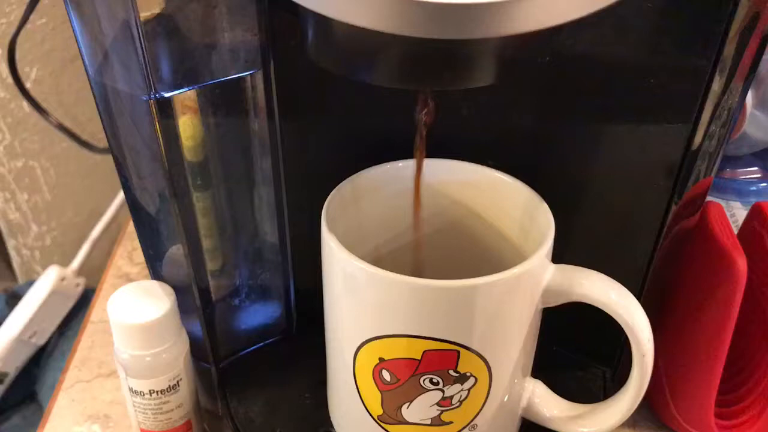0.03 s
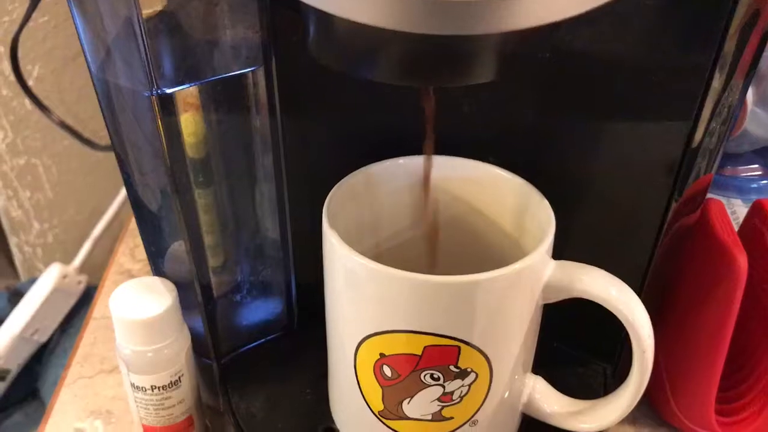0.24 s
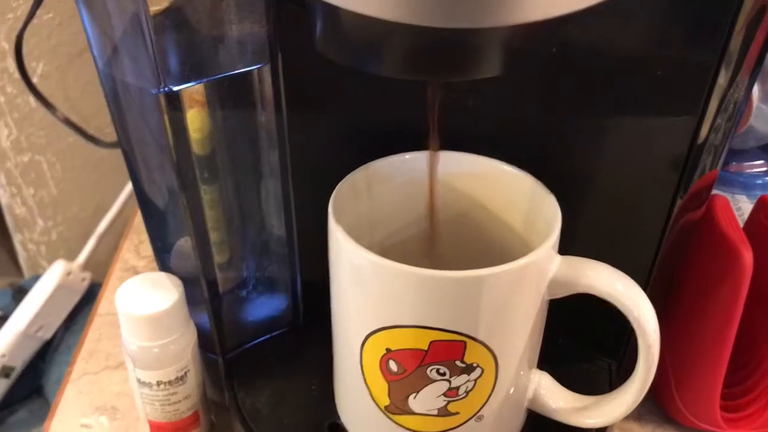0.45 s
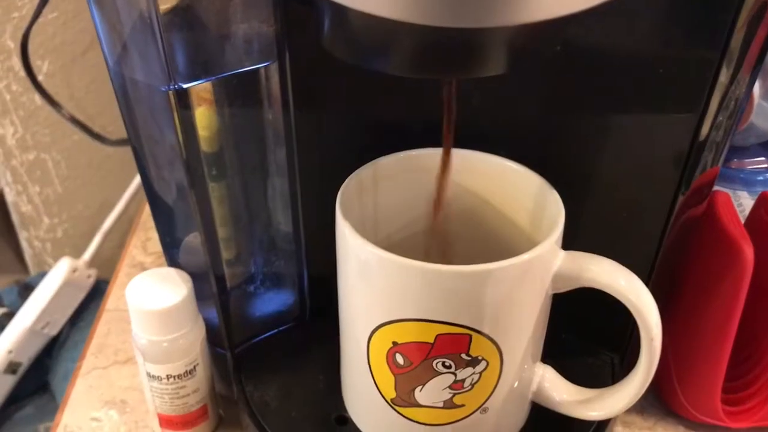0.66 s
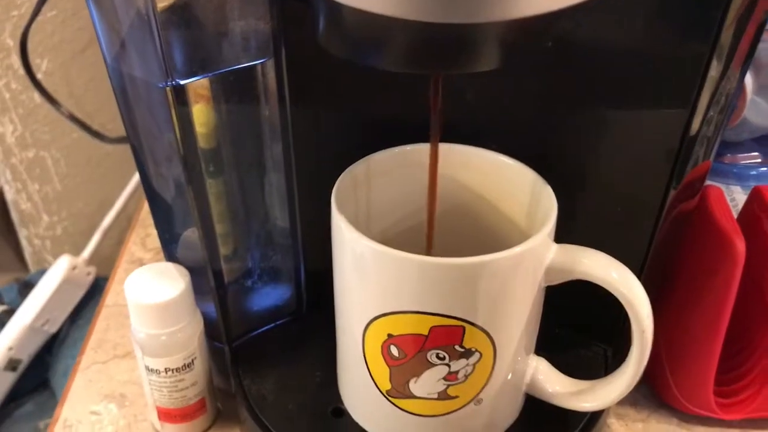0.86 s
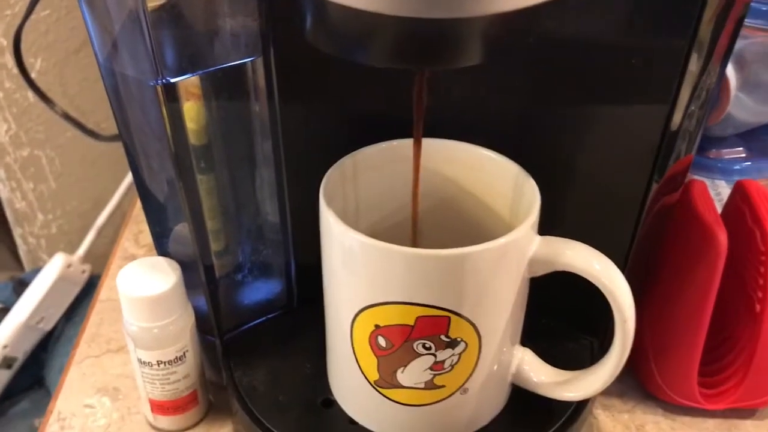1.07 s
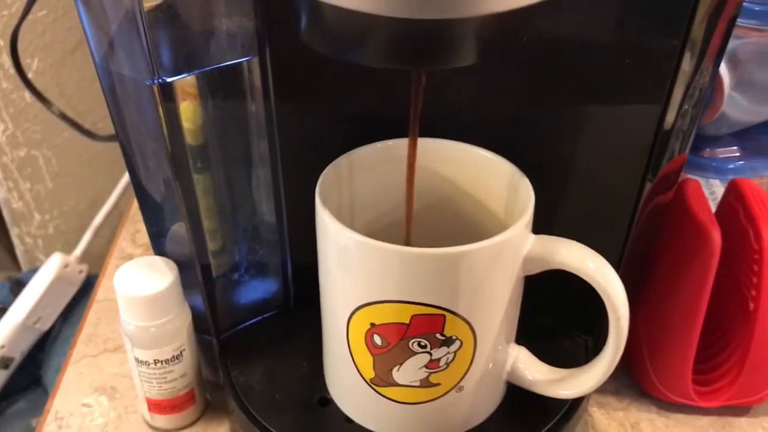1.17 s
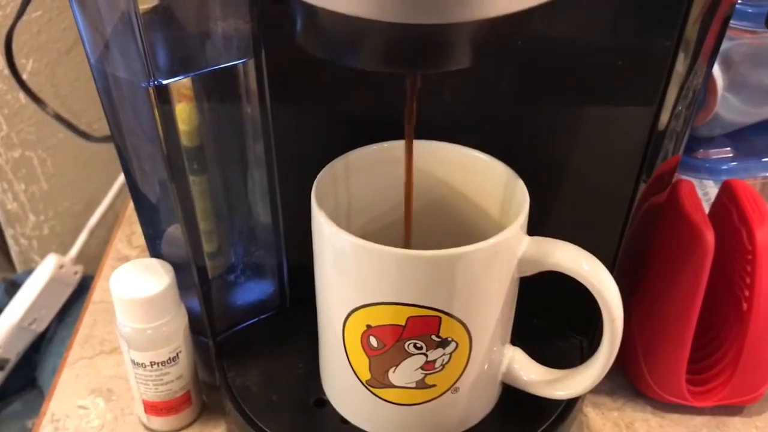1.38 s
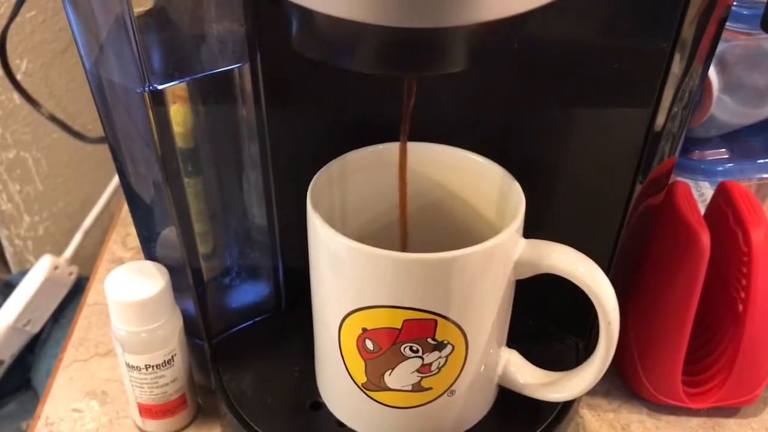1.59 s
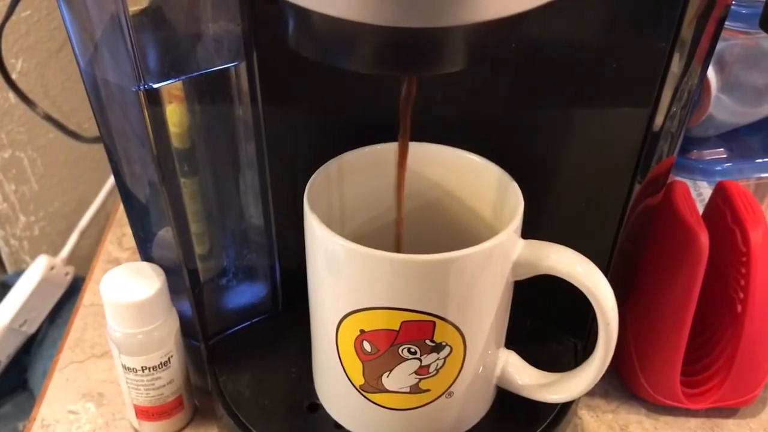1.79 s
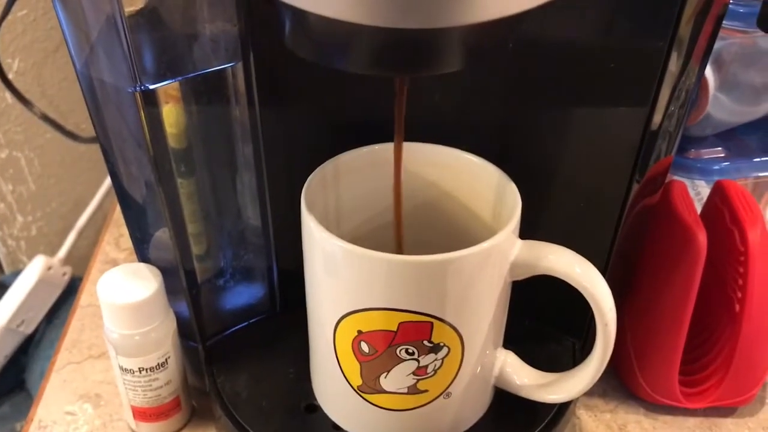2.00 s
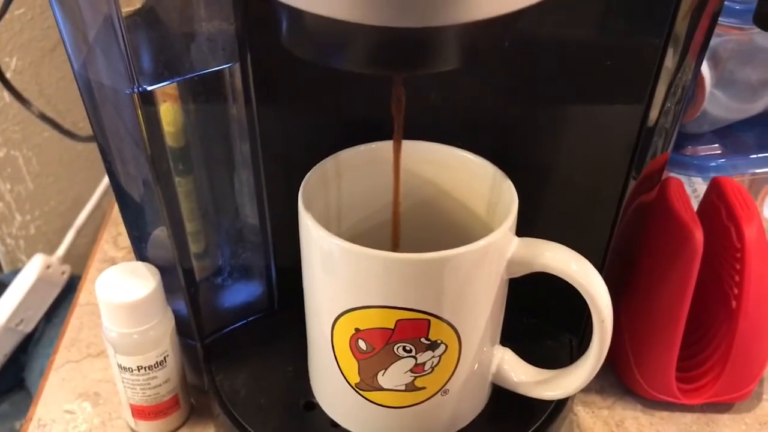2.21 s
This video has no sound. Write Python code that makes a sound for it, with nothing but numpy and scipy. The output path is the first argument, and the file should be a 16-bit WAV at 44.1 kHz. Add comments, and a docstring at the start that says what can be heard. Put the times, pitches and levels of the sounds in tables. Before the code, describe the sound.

After a very brief silence, a rattly coffee machine motor hums and wavers with regular dull knocks; fine crisp drips, faint hiss and small bubbly plips from the mug grow denser, heard close up indoors.

```python
"""After a brief silence one hears the buzz of a geared pump motor: a pod coffee maker close to a phone.
The motor's harmonics excite a resonant housing; it slows twice a stroke under load and knocks once a stroke.
A thin stream spatters in a ceramic mug: noise ticks ring decaying modes of the mug and the air in it,
over a fine hissing spray. Trapped bubbles are damped sines of rising pitch, burbles are swelling noise,
and low drones waver behind."""
import sys
import numpy as np
from scipy import signal
from scipy.fft import rfft, irfft, next_fast_len
from scipy.io import wavfile
from scipy.ndimage import map_coordinates

SR = 44100
rng = np.random.default_rng(int(sys.argv[2]) if len(sys.argv) > 2 else 0)


def gain_from_db(level_db):
    """Turn a decibel level (scalar or array-like) into a linear amplitude factor."""
    decades = np.asarray(level_db, float) / 20
    return 10 ** decades


def wav_out(sig):
    """Save sig, one row per channel (or a flat mono array), as 16-bit PCM at SR to the path in sys.argv[1]."""
    wavfile.write(sys.argv[1], SR, np.round(np.clip(np.atleast_2d(sig).T, -1, 1) * 32767).astype(np.int16))


N = 99225


def unit(x):
    """Normalisation: scales a signal to rms 1."""
    return x / np.sqrt(np.mean(x ** 2) + 1e-20)


def filtered(x, response):
    """Linear filtering: the spectrum of x is multiplied by a response of frequency."""
    m = next_fast_len(x.shape[-1] + 8192)
    hz = np.fft.rfftfreq(m, 1 / SR) + 1  # the 1 Hz offset keeps logarithms finite
    return irfft(rfft(x, m) * response(hz), m)[..., :x.shape[-1]]


def coloured(points):
    """Spectral shaping: white noise given a spectrum of (f/Hz, level/dB) points, at rms 1."""
    f, db = np.transpose(points)
    white = rng.standard_normal(N)
    return unit(filtered(white, lambda hz: gain_from_db(np.interp(np.log(hz), np.log(f), db))))


def place(times, rows):
    """Superposition: short sounds, one a row, add up at their times."""
    at = np.round(np.asarray(times) * SR).astype(int)[:, None] + np.arange(rows.shape[1])
    return np.bincount(np.clip(at, 0, N).ravel(), rows.ravel(), N + 1)[:N]


def bursts(peak_db, colour, t60, rise, size):
    """Transient noise: rows with an exponential rise and decay, each scaled to its peak."""
    t = np.arange(size) / SR
    noise = filtered(rng.standard_normal((len(peak_db), size)), colour)
    rows = noise * gain_from_db(-60 * t / t60) * (1 - np.exp(-t / rise))
    return rows / np.abs(rows).max(1, keepdims=True) * gain_from_db(peak_db)[:, None]


def band(centre_hz, octaves):
    """Band-pass response: a Gaussian bell on a logarithmic frequency axis."""
    return lambda hz: np.exp(-.5 * (np.log2(hz / centre_hz) / octaves) ** 2)


def wobble(knots_per_s):
    """Random modulation: a smooth curve through normally distributed knots."""
    return map_coordinates(rng.standard_normal(200), [np.arange(N) * knots_per_s / SR])


# resonances of the plastic housing: (f/Hz, width/Hz, gain level/dB)
HOUSING_MODES = [(151.6, 15.3, 0.5), (279.7, 22.4, 0), (306.7, 3.37, 4.5), (387, 22, -3),
                 (565.3, 48, -11.5), (735.6, 70, -6), (1026, 67, -9.5), (1289.4, 94, -0.5),
                 (1745, 157, -6.5), (2085, 206, -7.5), (2832, 260, -13), (3200, 233, -16.5),
                 (4930, 1750, -30)]


def housing(f):
    """Modal superposition: second-order resonances of alternating sign form the housing's response."""
    response = 0
    for k, (centre, width, db) in enumerate(HOUSING_MODES):
        resonance = 1j * f * width / (centre ** 2 - f ** 2 + 1j * f * width)
        response = response + (-1) ** k * gain_from_db(db) * resonance
    return response


FIRST_STROKE_S, STROKE_S = .2445, .5638
TURNS_PER_STROKE = 27
HUM_COUPLING = 0.42  # exponent: how far the housing colours the hum
HUM_FLUTTER_DB, HUM_FLUTTER_PER_S = 3, 9.71  # each harmonic wavers on its own
TURN_OFFSET, LAG_TURNS_PER_HZ, SLOW_HZ = .6, 0.029, 42.84  # the rattle falls later in a turn at speed
TAP_DB, TAP_HZ, TAP_OCTAVES = -4.5, 1300, 0.099  # a clean tap opens each rattle
RATTLE_DB, RATTLE_DECAY_PER_TURN, RATTLE_SCATTER_DB = -4, 5.9, 1.5
WHIRR_DB, RATTLE_ABOVE_HZ = -5, 360
# motor cycle: (t/s after the knock, nominal shaft f/Hz before fitting whole turns, gain level/dB)
MOTOR_CYCLE = [(0, 52.83, -57.5), (0.061, 50.09, -54.5), (0.107, 43.5, -55.5), (0.15, 42.75, -55.5),
               (0.199, 44.84, -53.5), (0.241, 50.59, -55), (0.286, 53.53, -49), (0.32, 51.92, -53.5),
               (.36, 44.82, -53.5), (0.421, 43.79, -54.5), (.47, 46.72, -52.5), (.52, 51.2, -53)]
# shaft harmonics: (multiple of shaft f, relative level/dB before the housing)
SHAFT_HARMONICS = [(1, -23), (2, -6), (3, -9), (4, -8), (5, -4), (6, -10.5), (7, -4.5), (8, -17.5),
                   (9, -17), (10, -13.5)]


def motor():
    """Source and resonator: shaft harmonics, once-a-turn taps and rattle, and whirr drive the housing."""
    into_stroke = (np.arange(N) / SR - FIRST_STROKE_S) % STROKE_S
    s, speed, level_db = np.transpose(MOTOR_CYCLE)
    speed = np.interp(into_stroke, s, speed, period=STROKE_S)
    level_db = np.interp(into_stroke, s, level_db, period=STROKE_S)
    # integrate speed to shaft turns, scaled to a whole number a stroke
    turn = np.cumsum(speed) * TURNS_PER_STROKE / speed[:round(STROKE_S * SR)].sum() + TURN_OFFSET

    hum = np.zeros(N)
    for k, db in SHAFT_HARMONICS:
        flutter = gain_from_db(db + HUM_FLUTTER_DB * wobble(HUM_FLUTTER_PER_S))
        coupling = np.abs(housing(k * speed)) ** HUM_COUPLING
        hum += flutter * coupling * np.sin(2 * np.pi * (k * turn + rng.random()))

    beat = turn - LAG_TURNS_PER_HZ * (speed - SLOW_HZ)
    strength = gain_from_db(RATTLE_SCATTER_DB * rng.standard_normal(200))[beat.astype(int)]
    gate = strength * np.exp(-RATTLE_DECAY_PER_TURN * (beat % 1))
    impulses = strength * np.diff(beat // 1, prepend=0)
    tap = unit(filtered(impulses, lambda f: housing(f) * band(TAP_HZ, TAP_OCTAVES)(f)))

    def light(f):
        return housing(f) / (1 + (RATTLE_ABOVE_HZ / f) ** 4)

    rattle = unit(filtered(gate * rng.standard_normal(N), light))
    whirr = unit(filtered(rng.standard_normal(N), light))
    return gain_from_db(level_db) * (2 * hum + gain_from_db(RATTLE_DB) * rattle + gain_from_db(TAP_DB) * tap + gain_from_db(WHIRR_DB) * whirr)


KITCHEN_DB = -52.5
# background spectrum: (f/Hz, relative level/dB per Hz)
BACKGROUND_SPECTRUM = [(15, 5.5), (25, -20), (59, 4), (118, -1), (299, 4.5), (446, -8.5), (680, -1.5),
                       (1040, -6), (1290, -4.5), (1540, -5), (2150, -30), (5000, -70), (6500, -46),
                       (11000, -120)]
# wavering low drones: (nominal f/Hz, rms level/dB, width/Hz)
LOW_DRONES = [(56.8, -59, 17), (88.67, -59.5, 0.89)]


def kitchen():
    """Stationary and narrow-band noise: a steady background and two low drones that waver."""
    sound = gain_from_db(KITCHEN_DB) * coloured(BACKGROUND_SPECTRUM)
    for centre, db, width in LOW_DRONES:
        white = rng.standard_normal(N)
        drone = unit(filtered(white, lambda hz: np.exp(-2 * ((hz - centre) / width) ** 2)))
        sound = sound + gain_from_db(db) * drone
    return sound


TICKS_PER_S, TICK_HZ, TICK_SPREAD_DB = 300, 10500, 12.5
WASH_DB, HISS_DB = 5, -69.5  # smooth wash relative to the ticks; rms of the steady hiss
# hiss spectrum: (f/Hz, relative level/dB per Hz)
HISS_SPECTRUM = [(2060, 0.5), (3500, -0.5), (4120, -5), (4870, -10.5), (5270, -0.5), (5770, -14.5),
                 (6740, -1.5), (7530, -5.5), (8570, -3.5), (10200, -10), (11400, -7), (15100, -4.5),
                 (16000, -14), (16500, -27)]
# fine spray, whose ticks have this rms: (t/s, level/dB)
SPRAY_LEVEL = [(.2, -80), (.45, -70.5), (.7, -71.5), (0.799, -70.5), (.95, -75), (1.101, -67.5),
               (1.401, -75), (1.7, -65.5), (1.95, -69), (2.25, -66.5)]


def spray():
    """Shot noise: faint random ticks merge into a wash of changing level, over a stationary hiss."""
    u = rng.random((int(TICKS_PER_S * N / SR), 2))
    hz = TICK_HZ * np.exp(0.46 * rng.standard_normal(len(u)))
    tick_db = -TICK_SPREAD_DB * np.log(u[:, 1] + 0.013)
    ticks = bursts(tick_db, band(hz[:, None], 0.13), t60=0.026, rise=0.00036, size=512)
    fine = unit(place(u[:, 0] * N / SR, ticks)) + gain_from_db(WASH_DB) * coloured(HISS_SPECTRUM)
    s, level_db = np.transpose(SPRAY_LEVEL)
    level = gain_from_db(np.interp(np.arange(N) / SR, s, level_db))
    return level * fine + gain_from_db(HISS_DB) * coloured(HISS_SPECTRUM)


BUBBLE_RISE_PER_S = 3.1  # pitch gained a second, as a fraction of the first pitch
GURGLE_PER_S, GURGLE_HZ, GURGLE_DB = 20, 2500, -72  # middle pitch, and about the faintest level
# clear bubbles under the stream: (t/s, level/dB before onset and decay, first f/Hz, t60/s)
CLEAR_BUBBLES = [(.735, -37.5, 3560, 0.011), (.886, -53, 5720, 0.022), (1.213, -37, 3120, 0.012),
                 (1.685, -37.5, 3960, 0.012), (1.786, -37.5, 2980, 0.037), (1.835, -40, 2980, 0.028),
                 (1.917, -45, 3000, 0.026), (1.972, -29.5, 2850, 0.021), (2.1048, -32, 4050, 0.015),
                 (2.1055, -35.5, 2850, 0.014), (2.13, -39, 2850, 0.022), (2.177, -37.5, 1770, 0.026),
                 (2.178, -43.5, 4020, 0.024)]


def bubbles():
    """Damped oscillation: short sines of rising pitch, some clear and many in a faint random gurgle."""
    u = rng.random((int(GURGLE_PER_S * N / SR), 4))
    gurgle = np.c_[u[:, 0] * N / SR,
                   GURGLE_DB - 5 * np.log(u[:, 1] + .02),
                   GURGLE_HZ * 2 ** (1.4 * u[:, 2] - .7),
                   .012 + .02 * u[:, 3]]
    s, db, hz, t60 = np.r_[CLEAR_BUBBLES, gurgle].T[:, :, None]
    t = np.arange(2000) / SR
    cycles = hz * (t + .5 * BUBBLE_RISE_PER_S * t * t)
    tone = np.sin(2 * np.pi * cycles) * (1 - np.exp(-t / 0.001))
    return place(s[:, 0], gain_from_db(db - 60 * t / t60) * tone)


SNAP_T60_S, DROP_T60_S, DROP_RISE_S = 0.0032, 0.022, 0.00042
AFTER_DB, SKIRT_DB = -9.5, -15.5  # spatter after the snap; broad skirt of the spectrum
RING_REACH_OCTAVES, RING_SCATTER_DB = 0.65, 2.5  # a drop rings the modes near its own centre
# modes of the mug, its air cavity (2850, 4060 Hz) and its ceramic wall: (f/Hz, relative level/dB, t60/s)
MUG_MODES = [(2850, 22, 0.03), (4060, 14.5, 0.02), (6110, 0.5, 0.056), (7600, 12.5, 0.011),
             (8500, -2, 0.036), (9500, 6.5, 0.016), (13500, 2, .015)]
# spattering drops: (t/s, snap peak level/dB, centre f/Hz, width/octaves, ring gain level/dB re snap)
SPATTER = [(0.1944, -33, 12900, 0.79, -31), (0.2344, -46.5, 12600, 0.21, -20),
           (0.314, -45.5, 9200, 0.46, -29), (0.4173, -48, 12360, 0.41, -23),
           (0.4292, -51, 12500, 0.25, -24), (0.434, -33.5, 14000, 0.1, -25),
           (0.5033, -45.5, 12600, 0.32, -29), (0.521, -48, 9750, 0.35, -35),
           (0.7481, -32.5, 7930, 0.27, -23), (0.76, -41, 13300, 0.24, -29), (0.7785, -30, 14200, 0.16, -30),
           (0.7861, -35, 7740, 0.11, -38), (0.817, -45, 11600, 0.4, -34), (0.8383, -50, 10500, 0.29, -39),
           (0.8488, -28.5, 13500, 0.31, -23.5), (1.009, -32.5, 15000, 0.11, -32),
           (1.0357, -40.5, 10100, 0.27, -20), (1.0418, -41, 10500, 0.39, -19),
           (1.046, -37, 8600, 0.099, -26), (1.0564, -40.5, 10000, 0.22, -32),
           (1.1173, -22.5, 7840, 0.93, -22), (1.1335, -35, 12900, 0.22, -40),
           (1.1517, -39, 13500, 0.14, -34), (1.292, -37.5, 12400, 0.38, -25),
           (1.3766, -24, 13350, 0.38, -27.5), (1.4983, -39, 7700, 0.14, -43),
           (1.527, -32, 12500, 0.49, -27), (1.5655, -18.5, 7000, 0.49, -27), (1.616, -44, 11400, 0.73, -14),
           (1.62, -39, 13400, 0.34, -26), (1.6374, -44, 11400, 0.31, -33), (1.6767, -42, 13100, 0.26, -28),
           (1.695, -26.5, 13100, 0.14, -25), (1.7031, -28.5, 11400, 0.24, -37),
           (1.7286, -35, 14200, 0.22, -27), (1.733, -31.5, 12300, 0.27, -20),
           (1.774, -48, 12300, 0.38, -28), (1.7848, -50.5, 7900, 0.52, -7), (1.7926, -41, 8000, 0.83, -27),
           (1.8144, -33.5, 12000, 0.27, -30), (1.8312, -40, 10100, 0.58, -21),
           (1.862, -26, 12650, 0.072, -25.5), (1.874, -32, 13500, 0.11, -28),
           (1.8884, -51, 13700, 0.39, -26), (1.908, -43, 9500, 1, -38), (1.943, -32.5, 12740, 0.8, -26),
           (1.95, -42, 13300, 0.32, -10), (1.9712, -30.5, 12100, 0.2, -20.5),
           (2.005, -33, 13000, 0.93, -37), (2.006, -26, 10900, 0.49, -26), (2.0078, -21.5, 8200, 0.14, -26),
           (2.0311, -37.5, 7700, 0.19, -25.5), (2.049, -34, 12800, 0.21, -33),
           (2.097, -49, 11500, 0.21, -17), (2.102, -38, 13500, .4, -35), (2.105, -33, 8000, 1, -30),
           (2.107, -38, 11000, 0.99, -34), (2.1105, -48, 11000, 0.76, -35), (2.125, -53, 9000, .5, -32),
           (2.127, -55, 9300, 0.58, -33.5), (2.1313, -24, 10670, 0.35, -36), (2.1321, -35.5, 8360, 1, -20),
           (2.1422, -41, 10400, 0.34, -27), (2.147, -28, 12600, 0.32, -30), (2.164, -42, 9960, 0.3, -19),
           (2.1778, -43, 8650, 0.47, -28), (2.2201, -48, 10200, 0.48, -25.5),
           (2.2239, -53, 11600, 0.43, -35), (2.238, -41.5, 12800, 0.34, -12.5),
           (2.2462, -32, 9050, 0.46, -37)]


def drops():
    """Impact excitation: each drop is a sharp noise tick that rings nearby modes of the mug and its air."""
    s, db, hz, octaves, ring_db = np.transpose(SPATTER)
    hz, t = hz[:, None], np.arange(3000) / SR

    def colour(f):
        return band(hz, octaves[:, None])(f) + gain_from_db(SKIRT_DB) * band(hz, .6)(f)

    snap = bursts(db, colour, SNAP_T60_S, DROP_RISE_S, size=len(t))
    after = bursts(db + AFTER_DB, colour, DROP_T60_S, DROP_RISE_S, size=len(t))
    share = gain_from_db(RING_SCATTER_DB * rng.standard_normal((len(s), len(MUG_MODES))))
    share = share * band(hz, RING_REACH_OCTAVES)(np.array(MUG_MODES)[:, 0])
    modes = np.array([gain_from_db(g - 60 * t / t60) * np.sin(2 * np.pi * f * t) for f, g, t60 in MUG_MODES])
    ring = gain_from_db(db + ring_db)[:, None] * (share @ modes)
    return place(s, snap + after + ring)


CHATTER_DB, CHATTER_T60_S, CONTACT_SCATTER_S = -18, 0.012, 0.00015
# main knock of each stroke: (t/s)
KNOCK_TIMES = [0.2444, 0.8072, 1.3708, 1.936]
# contacts in the pump: (t/s after the knock, mean peak level/dB, centre f/Hz, width/octaves)
PUMP_CONTACTS = [(.001, -30.5, 3060, 0.55), (.001, -27.5, 1850, .3), (.0035, -36, 750, .4),
                 (.005, -29, 550, .8), (.0065, -30, 2000, .35), (.0105, -36.5, 1400, .4),
                 (.009, -36, 203, 0.97), (.041, -35.5, 1340, .12), (.0445, -37, 1340, .12),
                 (.0392, -36.5, 2400, .6), (.054, -38, 1700, .6), (.057, -40, 398, 0.73),
                 (.197, -40.5, 715, 0.65), (.285, -37.5, 1300, .9)]


def knocks():
    """Impulse response: contacts recur every stroke, each a blow with chatter that rings the housing."""
    after, db, hz, octaves = np.tile(PUMP_CONTACTS, (len(KNOCK_TIMES), 1)).T
    times = np.repeat(KNOCK_TIMES, len(PUMP_CONTACTS)) + after
    t = np.arange(-256, 8000) / SR
    decay = gain_from_db(CHATTER_DB - 60 * t / CHATTER_T60_S) * (t > 0)
    chatter = decay * rng.standard_normal((len(db), len(t)))
    colour = band(hz[:, None], octaves[:, None])
    rows = filtered((t == 0) + chatter, lambda f: colour(f) * housing(f))
    peak = gain_from_db(db + rng.normal(0, 1, len(db)))[:, None]
    rows = rows / np.abs(rows).max(1, keepdims=True) * peak
    return place(times + t[0] + CONTACT_SCATTER_S * rng.standard_normal(len(db)), rows)


BURBLE_OCTAVES, BURBLE_RISE_S = 0.57, 0.019
# brief splashy burbles: (t/s, peak level/dB, centre f/Hz, t60/s)
SPLASHY_BURBLES = [(0.734, -50, 4260, 0.029), (1.041, -56, 3650, 0.042), (1.295, -45, 2730, 0.028),
                   (1.816, -43, 2920, 0.2), (1.91, -48, 3200, 0.086)]


def burbles():
    """Band-limited noise: soft swells of mid-band splash with a gradual onset."""
    s, db, hz, t60 = np.transpose(SPLASHY_BURBLES)
    return place(s, bursts(db, band(hz[:, None], BURBLE_OCTAVES), t60[:, None], BURBLE_RISE_S, size=5000))


ROOM_DB, ROOM_T60_S = -21, 0.13


def room(near):
    """Reverberation: convolution with decaying noise gives a short answer from the counter and walls."""
    t = np.arange(SR // 4) / SR
    tail = rng.standard_normal(len(t)) * gain_from_db(-60 * t / ROOM_T60_S)
    return gain_from_db(ROOM_DB) * signal.fftconvolve(near, tail / np.linalg.norm(tail))[:N]


def scene():
    """Superposition of sources: the short sounds with their reverberation, and the continuous ones dry."""
    near = bubbles() + drops() + knocks() + burbles()
    return (motor() + kitchen() + spray() + near + room(near))[None]


def low_pass(x):
    """Removes everything above the highest recorded frequency."""
    return signal.sosfilt(signal.butter(12, 16810, fs=SR, output="sos"), x)


START_S, FADE_S = 0.119, 0.0063
TOP_HZ, TOP_SLOPE_HZ = 16060, 150


def record(dry):
    """Band limitation: a steep low-pass ends the microphone path; the sound cuts in within milliseconds."""
    heard = filtered(dry, lambda hz: 1 / (1 + np.exp(np.clip((hz - TOP_HZ) / TOP_SLOPE_HZ, -50, 50))))
    fade_in = np.clip((np.arange(N) / SR - START_S) / FADE_S, 0, 1)
    return low_pass(heard * fade_in)


dry = scene()
out = record(dry)
wav_out(out)
```